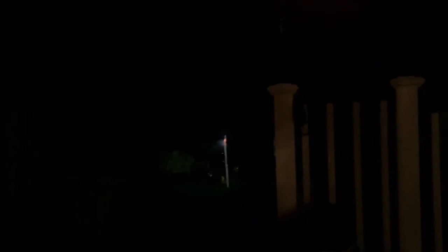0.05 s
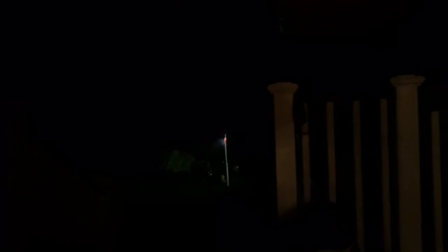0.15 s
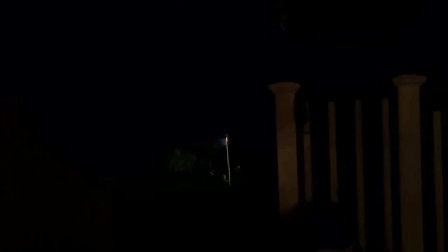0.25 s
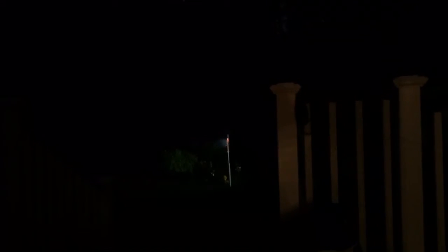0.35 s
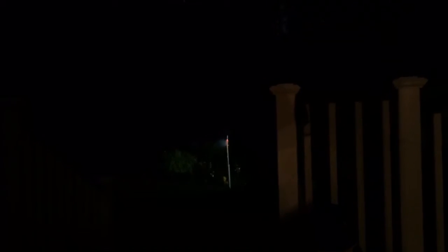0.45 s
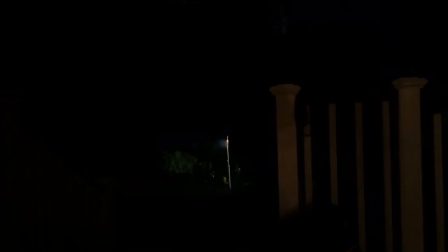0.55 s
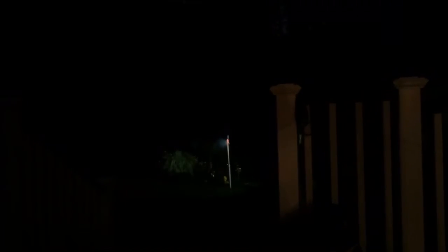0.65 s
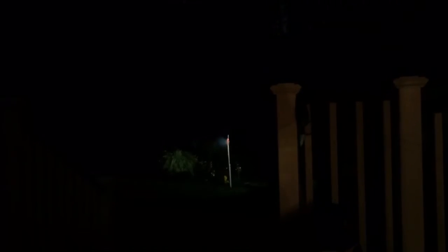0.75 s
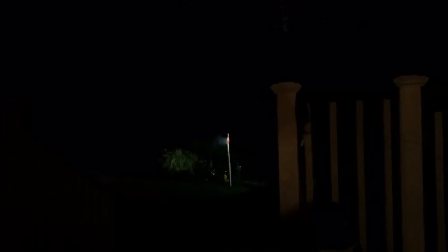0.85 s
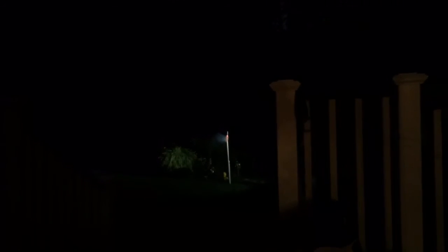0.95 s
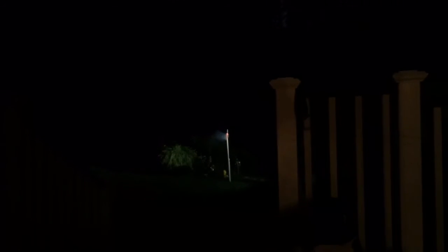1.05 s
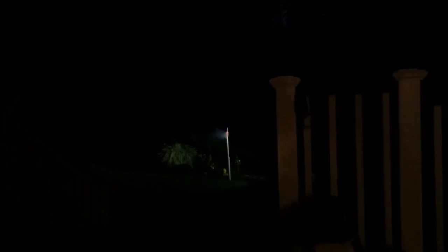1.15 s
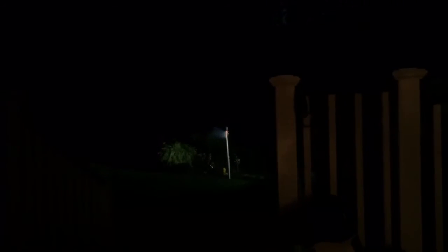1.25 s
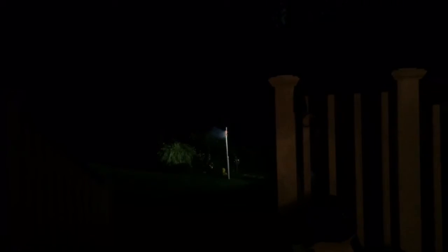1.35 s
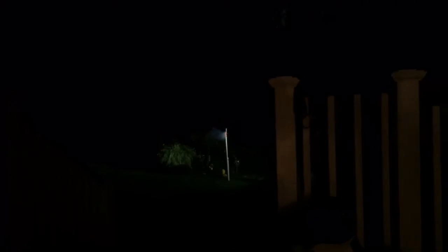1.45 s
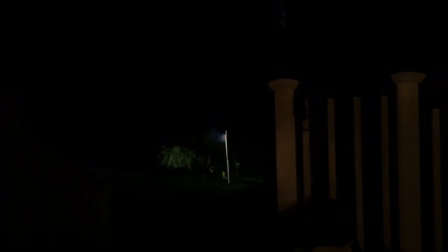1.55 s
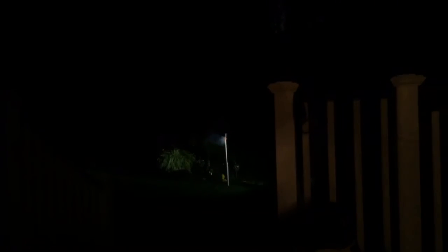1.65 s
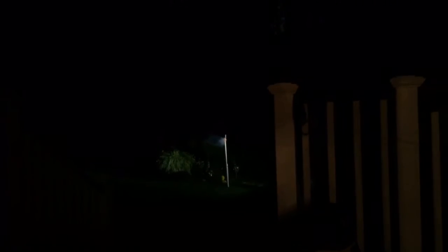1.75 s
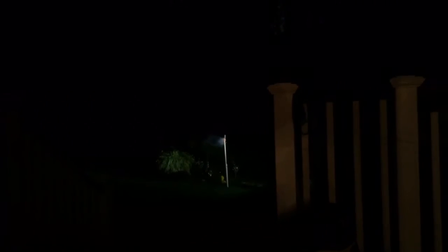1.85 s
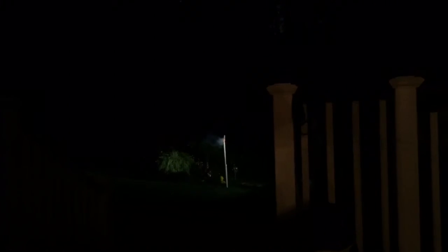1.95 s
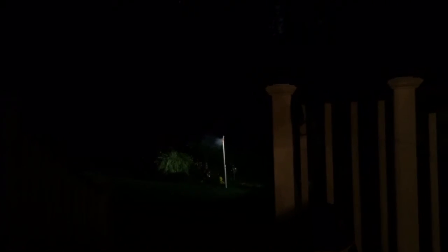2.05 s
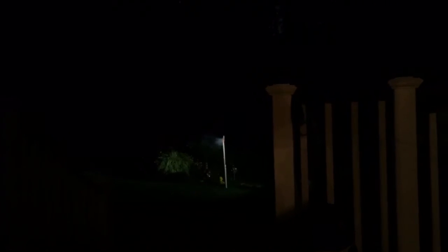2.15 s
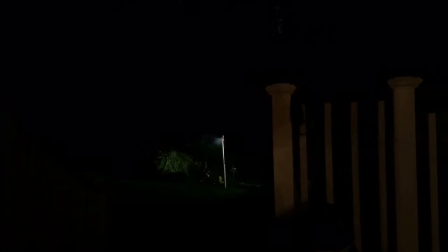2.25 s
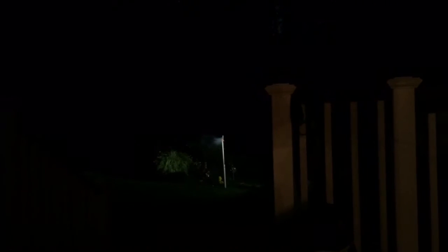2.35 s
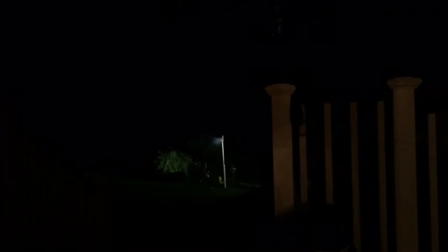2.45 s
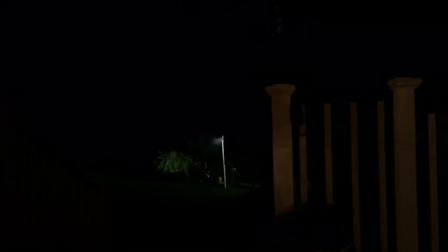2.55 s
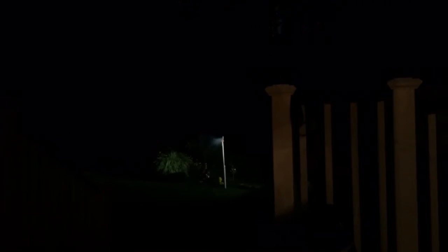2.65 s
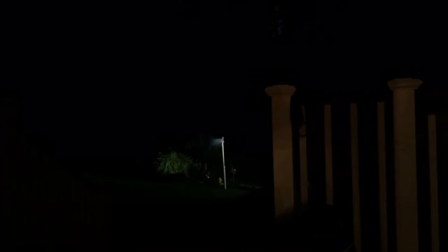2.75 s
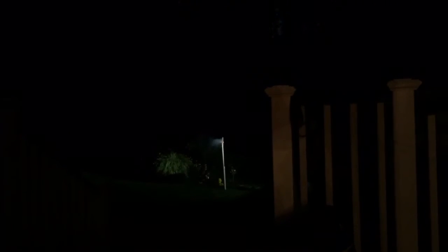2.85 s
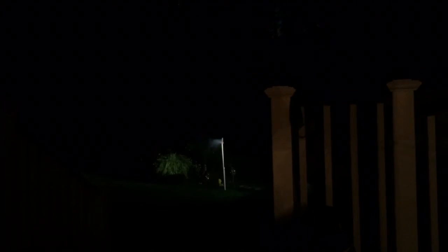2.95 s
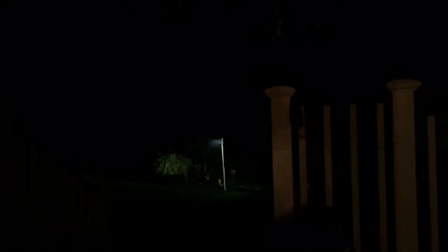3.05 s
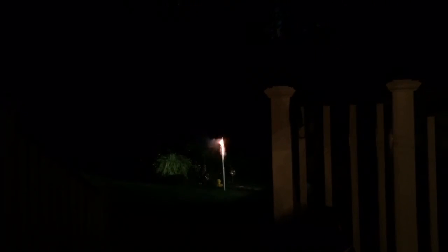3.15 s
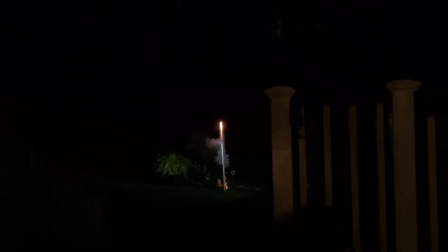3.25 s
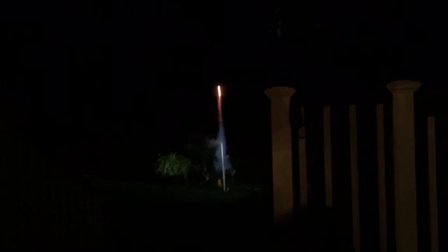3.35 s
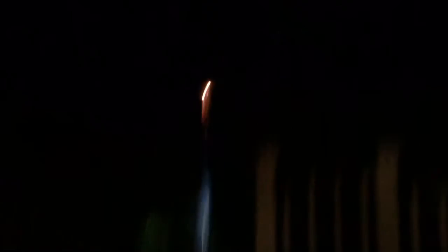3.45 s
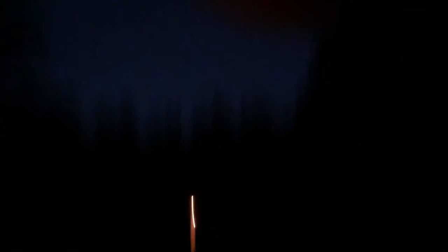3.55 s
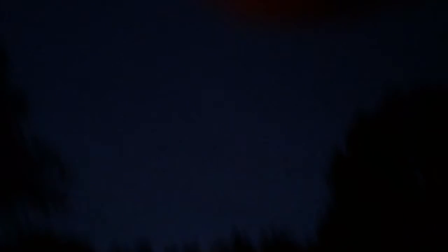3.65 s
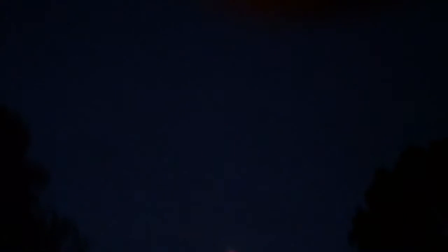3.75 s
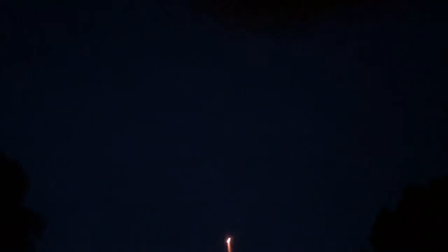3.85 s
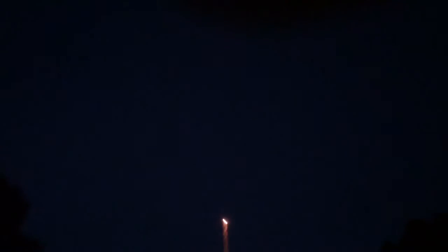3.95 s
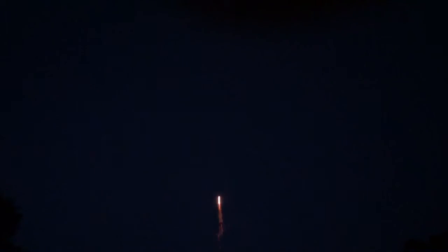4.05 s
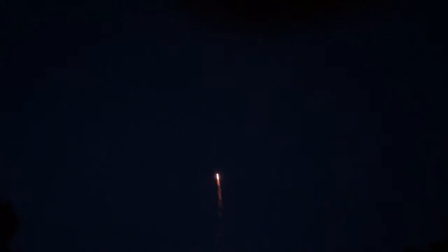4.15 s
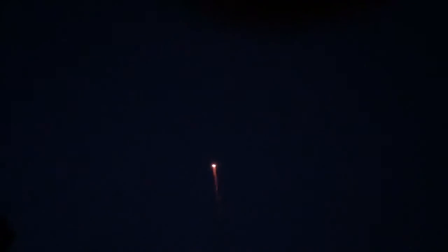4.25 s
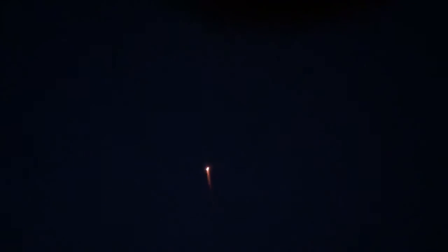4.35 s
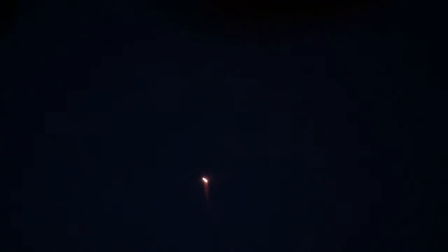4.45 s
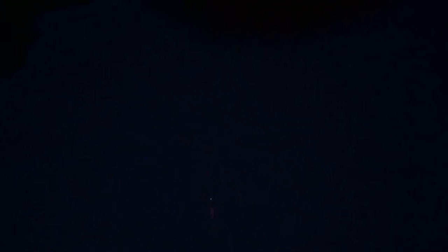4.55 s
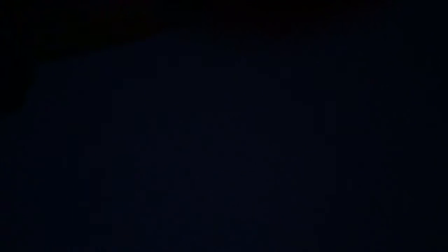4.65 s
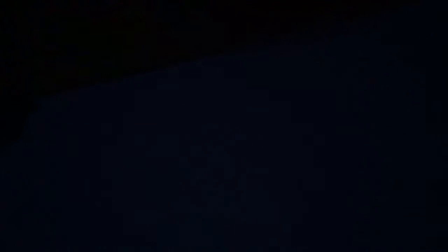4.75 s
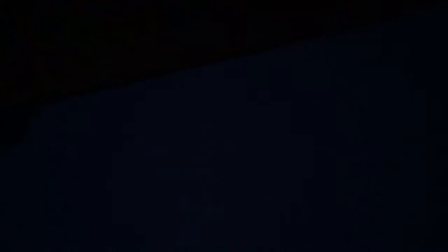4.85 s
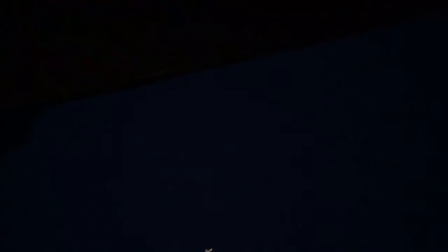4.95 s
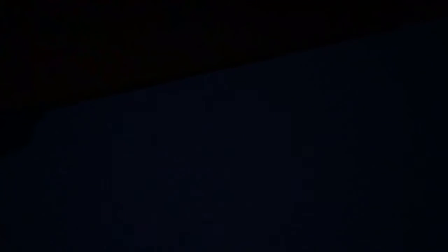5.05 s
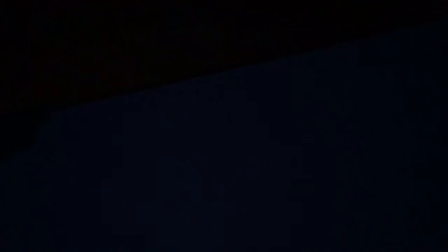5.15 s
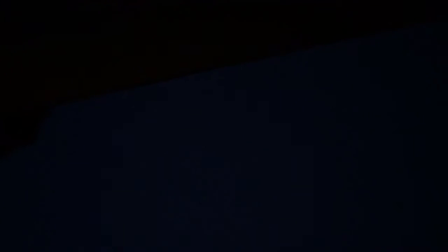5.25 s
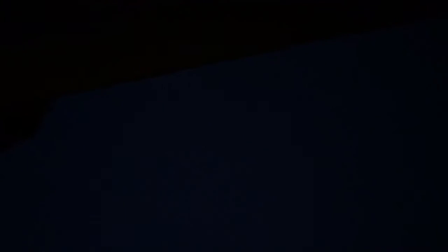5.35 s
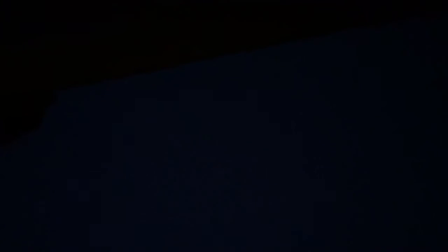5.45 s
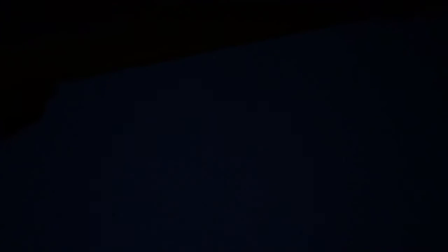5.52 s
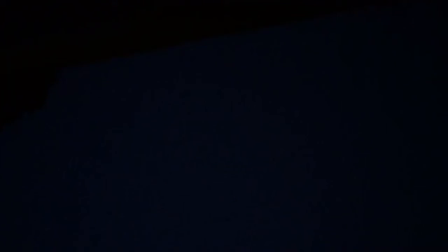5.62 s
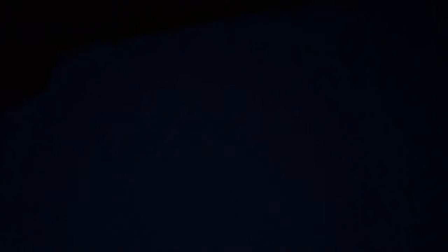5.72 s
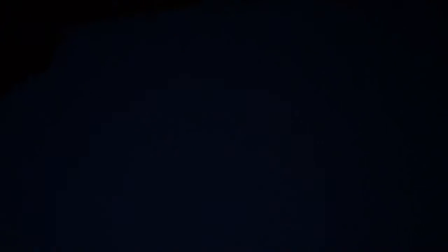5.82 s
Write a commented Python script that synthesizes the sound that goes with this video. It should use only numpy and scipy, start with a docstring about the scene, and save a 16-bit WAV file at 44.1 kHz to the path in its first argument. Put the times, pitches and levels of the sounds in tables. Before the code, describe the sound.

In a still night garden, soft air rumble, faint trilling insects and a fading fuse hiss are joined by two dull distant firework thuds. After three seconds a rocket spits alight and screams, piercing and raspy, its pitch sliding down as it climbs and stutters. It cuts out, leaves a short hiss, then bursts with a very sharp bang echoing off trees and houses. The fixed microphone overloads slightly and its automatic gain ducks.

```python
"""Night in a garden: still air, a far chorus of trilling insects, and a fuse's faint hiss over a low rumble.
The fuse pops once; then two far fireworks, low noise thumps, thud and roll over the land.
A whistling rocket lights with a spit: a pulsing pipe tone with overtones and rasping jet noise falls in pitch
as it climbs, falters, and roars when the nozzle tips towards the listener. It burns out, hisses on briefly
and bursts in sharp pressure pulses, a boom and a crack. Trees and houses scatter whistle and bang back."""
import sys
import numpy as np
from scipy import signal
from scipy.fft import rfft, irfft
from scipy.io import wavfile

SR = 44100
rng = np.random.default_rng(int(sys.argv[2]) if len(sys.argv) > 2 else 0)


def store_wav(level_fs):
    """Save 16-bit WAV to argv[1]."""
    pcm = np.round(np.clip(np.atleast_2d(level_fs), -1, 1) * 32767)
    wavfile.write(sys.argv[1], SR, pcm.T.astype(np.int16))


N = 259554
T = np.arange(N) / SR  # time of every sample [s]

# Spectra are colours only: their levels are relative, within each table.
# colour of the night air: (frequency [Hz], level per Hz [dB])
AIR_COLOUR = [(25, -17), (60, 4.5), (150, 2.5), (330, -2), (520, -12), (1000, -21.5), (1600, -20),
              (4000, -26), (9000, -28.5), (16000, -36)]
# insect chorus: (time [s], level [dB], centre frequency [Hz])
INSECT_CHORUS = [(0, -72, 2133), (1.9, -64, 2242), (2.55, -64.5, 2300), (3.2, -66.5, 2280)]
# colour of the noise before launch: the fuse's hiss over a low rumble, perhaps an earlier firework's roll:
# (frequency [Hz], level per Hz [dB])
PRELAUNCH_COLOUR = [(200, 8), (350, 18.5), (550, -4), (900, 3.5), (1600, -10), (4000, -9.5), (5350, -5.5),
                    (6200, -7), (8500, -11.5), (10000, -22.5), (12000, -10.5), (16000, -23)]
# soft knock of the fuse's pop: (frequency [Hz], level [dB], t60 [s])
SPARK_KNOCK = [(315, -26.5, 0.011), (120, -30, 0.026)]
# far fireworks: (time [s], level [dB], upper edge [Hz], echo delay [s],
#                 echo re thud [dB], rolling echo re thud [dB])
FAR_BANGS = [(0.921, -20.5, 361, 0.02, -3, -23), (2.204, -22.5, 468, .033, -12, -29.5)]
# colour of the thuds' rolling echo: (frequency [Hz], level per Hz [dB])
ROLL_COLOUR = [(24, -46), (40, -14), (70, -5.5), (161, -4.5), (215, 0), (279, 2), (355, -0.5), (496, -24),
               (843, -25), (1500, -42), (1950, -60), (3300, -120)]
# whistle pipe, which lengthens as the fuel burns: (time [s], pitch before flare, Doppler and jitter [Hz])
PIPE_PITCH = [(3.34, 2711), (3.59, 2553), (3.96, 2233), (4.13, 2244), (4.194, 2162), (4.248, 2165),
              (4.63, 1989)]
# the pipe sings softly a moment before the jet breaks out, and stops at burnout:
# (time [s], share of full tone [0-1])
PIPE_SINGING = [(3.267, 0), (3.279, .07), (3.283, .8), (3.292, 1), (4.666, 1), (4.68, 0)]
# the tone sinks, catches again and surges: (time [s], depth [dB], sinking time [s])
TONE_FADES = [(3.335, 3.5, 0.006), (3.416, 17.5, 0.018), (3.481, 21, 0.0047), (3.559, 3.5, 0.035),
              (3.652, 7.5, .06), (3.701, 10, 0.005), (3.756, 9, 0.0057), (3.843, 40, 0.012),
              (3.915, 17, 0.015), (3.977, 19, 0.013)]
# overtones of the pipe, before each path's trim: (multiple of the pitch [1], level [dB])
PIPE_OVERTONES = [(2, -6.5), (3, -8), (4, -14.5), (5, -13.5), (6, -16.5)]
# lines between them, from uneven alternate cycles, before HALF_ORDER_DB: (multiple of the pitch [1], level [dB])
HALF_ORDER_LINES = [(.5, -19.5), (1.5, -8), (2.5, -4.5), (3.5, -6), (4.5, -8.5), (5.5, -16.5), (6.5, -19.5)]
# colour of the exhaust jet: (frequency [Hz], level per Hz [dB])
JET_COLOUR = [(60, -36.5), (350, -13.5), (750, -16.5), (1200, -17), (2000, 6), (3100, 1.5), (5000, 1.5),
              (7200, 6.5), (9000, 5.5), (10500, -6), (16000, -8.5)]
# thumps of the motor lighting, leaving the ground and dying, before ROCKET_DB:
# (time [s], level [dB], t60 [s], upper edge [Hz])
MOTOR_THUMPS = [(3.282, -36, 0.11, 587), (3.3, -33, 0.18, 61), (4.672, -51, 0.11, 560)]
# scatter from the surroundings:
# (frequency [Hz], near trees per Hz [dB], far houses per Hz [dB], far t60 [s])
SURROUNDINGS = [(59, -25.5, -13.5, 8.5), (206, -6, -8, 2.45), (513, -8, -6.5, 6.2), (1080, 13, 3.5, 2.2),
                (2040, 7.5, 4.5, 3.01), (3220, 15.5, -6, 2.04), (5080, -10.5, -2.5, 1.24),
                (8470, 3, -10.5, 0.73), (15110, -11.5, -23.5, 0.36)]
# the burst and its echoes off ground and walls, before ROCKET_DB: (time [s], level [dB], pulse length [s])
BURST_PULSES = [(5.1892, 15, 0.00036), (5.1895, 13.5, 0.00039), (5.1899, -9, 0.001197),
                (5.1921, -5.5, 0.00066), (5.1973, -12.5, 0.00076), (5.199, -8.5, 0.00322),
                (5.203, -7, 0.00064), (5.223, -9, 0.00036)]
# colour of the nearest echoes' clutter: (frequency [Hz], level per Hz [dB])
CLUTTER_COLOUR = [(24, -25.5), (40, -4), (96, 0), (290, 7), (516, -1), (1240, 4), (1810, -29), (2260, 0.5),
                  (2570, -9), (3470, 0.5), (4930, -10), (11800, -57), (16000, -22)]

# the noise before launch sinks as the fuse burns into the casing
PRELAUNCH_START_DB, PRELAUNCH_FALL_DB_PER_S, PRELAUNCH_FLICKER_DB = -62, 9, 2
SPARK_S = 0.24
FAR_BANG_T60_S, FAR_ECHO_T60_S = 0.096, 0.25
IGNITION_S, BURNOUT_S = 3.28, 4.666
ROCKET_DB = 8  # raises all the rocket's levels below against the night
# a brief flare at ignition lifts pitch, tone and rasp
FLARE_HZ, FLARE_PITCH_HOLD_S, FLARE_PITCH_S = 332, 0.012, 0.009
FLARE_TONE_DB, FLARE_RASP_DB, FLARE_S = 4, 11, 0.064
# levels at lift-off, and their fall as the rocket climbs away; half orders and jet are relative to the rasp
TONE_DB, TONE_FALL_DB_PER_S = -9, 11
RASP_DB, RASP_FALL_DB_PER_S = -28, 6.5
HALF_ORDER_DB, HALF_ORDER_FALL_DB_PER_S = 2, 8
JET_DB, JET_FALL_DB_PER_S = -4.5, 4
# each drop-out of the tone ends in a quick catch and an overshoot
CATCH_S, SURGE_DB, SURGE_AFTER_S = 0.0065, 1.5, 0.017
# the nozzle tips towards the listener once: jet and low roar swell, the pitch gets rougher
TIP_S, TIP_ATTACK_S, TIP_HOLD_S, TIP_RELEASE_S = 4.0, 0.05, 0.21, 0.24
TIP_JET_DB, ROAR_DB, TIP_ROAR_DB = 7.5, -23.5, 11.5
TIP_TONE_LOSS_DB, TIP_FLUTTER_DB = 1.5, 1
JITTER, TIP_JITTER = 0.00475, 0.0096  # share of the pitch; the tip's is added
ROUNDING_DB_PER_S = 25  # loss from the tip onwards, for each multiple above the fourth
COLLAPSE_S = 4.63  # the tone breaks down just before burnout
BLOW_OUT_T60_S, BLOW_OUT_HZ = 1, 4500  # hiss after burnout, and its lower edge
# treble loss at 10 kHz, growing as the rocket gathers speed; each path takes a share of it
AIR_LOSS_DB_PER_S2 = 1
DIRECT_AIR_SHARE, SCATTER_AIR_SHARE = 0.86, 0.087
# more of the tone reaches the surroundings once the rocket clears the trees
CLEARING_S, SHADED_DB = 0.52, 20.5
SCATTER_TONE_DB, SCATTER_TONE_FALL_DB_PER_S = -18.5, 10
SCATTER_RASP_DB, SCATTER_RASP_FALL_DB_PER_S = -28, 0.5
# automatic gain: turned down under loud sound, slow to recover
DUCK_ABOVE_DB, DUCK_MOST_DB, DUCK_ATTACK_S, DUCK_RELEASE_DB_PER_S = -14.5, 8, 0.0011, 2.5
CUTOFF_HZ = 15900


def from_db(db):
    """Decibels to an amplitude factor."""
    return 10 ** (np.asarray(db) / 20)


def rms_one(x):
    """Scale to rms 1."""
    return x / np.sqrt(np.mean(x ** 2) + 1e-20)


def in_time(rows):
    """Each column of a curve, at every sample."""
    s, *columns = np.transpose(rows)
    return [np.interp(T, s, column) for column in columns]


def at_hz(points, hz, axis=1):
    """One column of a spectrum, read on a log-frequency axis."""
    points = np.array(points)
    return np.interp(np.log(hz), np.log(points[:, 0]), points[:, axis])


def butter(x, hz, kind, order=2):
    """Butterworth low- or high-pass."""
    sos = signal.butter(order, np.clip(hz, 10, 0.45 * SR), kind, fs=SR, output="sos")
    return signal.sosfilt(sos, x)


def drift(rate_hz):
    """Slow random wandering, rms 1."""
    f = np.arange(N // 2 + 1) * SR / N
    return rms_one(irfft(rfft(rng.standard_normal(N)) / (1 + (f / rate_hz) ** 4), N))


def noise(spectrum):
    """Steady noise of a given colour, rms 1."""
    f = np.arange(N // 2 + 1) * SR / N + 1
    return rms_one(irfft(rfft(rng.standard_normal(N)) * from_db(at_hz(spectrum, f)), N))


def bands(x):
    """Split into half-octave bands that add up to the whole: (centre Hz, band)."""
    centres = np.geomspace(40, 16000, 18)
    log_f = np.log(np.arange(N // 2 + 1) * SR / N + 1)
    whole = rfft(x)
    split = []
    for hz, one in zip(centres, np.eye(len(centres))):
        share = np.interp(log_f, np.log(centres), one)
        split.append((hz, irfft(whole * share, N)))
    return split


def blurred_line(phase, width_hz):
    """A tone whose strength and phase wander, about rms 1."""
    return (drift(width_hz) * np.sin(phase) + drift(width_hz) * np.cos(phase)) / np.sqrt(2)


def decay(start, t60, rise):
    """An envelope that swells and dies away by 60 dB per t60."""
    age = np.maximum(T - start, 0)
    return (1 - np.exp(-age / rise)) * from_db(-60 * age / t60)


def ramp(start, length):
    """Rises from nothing to one."""
    return np.clip((T - start) / length, 0, 1)


def night_air(level_db=-63.0):
    """Still air as steady coloured noise."""
    return from_db(level_db) * noise(AIR_COLOUR)


def insects(width_hz=185, throb_db=2.5):
    """Many far trills blend into one blurred, throbbing line."""
    level, centre = in_time(INSECT_CHORUS)
    trill = blurred_line(2 * np.pi * np.cumsum(centre) / SR, width_hz)
    return trill * from_db(level + throb_db * drift(8.3))


def fuse_and_rumble(whistle_hz=5400, whistle_width_hz=110, whistle_db=-11.5):
    """Burning powder hisses with a thin whistle, over a low rumble, until the rocket lights."""
    thin_whistle = blurred_line(2 * np.pi * whistle_hz * T, whistle_width_hz)
    hiss_and_rumble = noise(PRELAUNCH_COLOUR)
    sound = hiss_and_rumble + from_db(whistle_db) * thin_whistle
    level = PRELAUNCH_START_DB - PRELAUNCH_FALL_DB_PER_S * T + PRELAUNCH_FLICKER_DB * drift(8.7)
    return sound * from_db(level) * (T < IGNITION_S)


def spark(tick_db=-49, tick_t60=0.024, tick_hz=2600):
    """One small, soft pop of the burning fuse: a faint noise tick and a low knock of dying sines."""
    burst_noise = rng.standard_normal(N) * decay(SPARK_S, tick_t60, 0.00018)
    pop = from_db(tick_db) * butter(burst_noise, tick_hz, "low", order=1)
    for hz, db, t60 in SPARK_KNOCK:
        pop += from_db(db) * np.sin(2 * np.pi * hz * (T - SPARK_S)) * decay(SPARK_S, t60, 0.0003)
    return pop


def thud(s, db, t60, edge_hz, crack_db=-29.0, crack_hz=1450):
    """A blast of dying noise, low-passed to a low thump with a faint dull crack."""
    blast = butter(rng.standard_normal(N) * decay(s, t60, 0.00077), edge_hz / 4, "high")

    def below(hz):
        # the root makes up for the narrower band
        return butter(blast, hz, "low", order=6) * np.sqrt(SR / hz)

    return from_db(db) * (below(edge_hz) + from_db(crack_db) * below(crack_hz))


def far_fireworks(roll_t60=6.17):
    """Dull thuds that each echo once and roll on over the land as slowly dying noise."""
    thuds, roll_power = np.zeros(N), np.zeros(N)
    for s, db, edge_hz, delay, echo_db, roll_db in FAR_BANGS:
        thuds += thud(s, db, FAR_BANG_T60_S, edge_hz)
        thuds += thud(s + delay, db + echo_db, FAR_ECHO_T60_S, edge_hz)
        roll_power += (from_db(db + roll_db) * decay(s, roll_t60, 0.12)) ** 2
    return thuds + np.sqrt(roll_power) * noise(ROLL_COLOUR)


def flight_time():
    """Seconds since ignition, zero before it."""
    return np.maximum(T - IGNITION_S, 0)


def tipping():
    """How far the nozzle points at the listener, 0-1."""
    return ramp(TIP_S, TIP_ATTACK_S) - ramp(TIP_S + TIP_ATTACK_S + TIP_HOLD_S, TIP_RELEASE_S)


def faltering():
    """Change of the tone in dB: at each drop-out it sinks, catches quickly and overshoots."""
    def bump(s, width):
        return np.exp(-((T - s) / width) ** 2)

    change = np.zeros(N)
    for s, depth, sink in TONE_FADES:
        change -= depth * bump(s, np.where(T < s, sink, CATCH_S))
        change += SURGE_DB * bump(s + SURGE_AFTER_S, SURGE_AFTER_S / 2)
    return change


def whistle(tone_db, rasp_db, doppler, smear, air_share, overtones_db, tilt_db, overtone_fade_db=3.0,
            half_width_hz=170, sputter_db=1.74, roar_hz=1550, roar_width_hz=330):
    """The fuel burns in pulses at the pipe's pitch; alternate cycles are uneven, and the jet roars around them."""
    (pitch,), (singing,) = in_time(PIPE_PITCH), in_time(PIPE_SINGING)
    age, tipped = flight_time(), tipping()
    pitch = pitch + FLARE_HZ * np.exp(-np.maximum(age - FLARE_PITCH_HOLD_S, 0) / FLARE_PITCH_S)
    # doppler, jitter and smear are shares of the pitch
    roughness = np.hypot(JITTER + TIP_JITTER * tipped, smear)
    phase = 2 * np.pi * np.cumsum(pitch * (1 + doppler + roughness * drift(202.3))) / SR
    air_loss = air_share * AIR_LOSS_DB_PER_S2 * age ** 2
    rounding = ROUNDING_DB_PER_S * np.maximum(T - TIP_S, 0)

    def through_air(hz):
        return from_db(-air_loss * (hz / 10 ** 4) ** 2)

    def line_gain(k, db):
        # the lengthening pipe rounds its pulses, so the highest lines sink into the hiss
        return from_db(db - rounding * max(k - 4, 0)) * through_air(k * pitch)

    jet_db = JET_DB - JET_FALL_DB_PER_S * age + TIP_JET_DB * tipped + sputter_db * drift(62.4)
    jet = sum(band * through_air(hz) for hz, band in bands(noise(JET_COLOUR))) * from_db(jet_db)
    blow_out = butter(jet, BLOW_OUT_HZ, "high") * decay(BURNOUT_S, BLOW_OUT_T60_S, 0.0046)
    # a lower roar swells while the nozzle points down at the listener
    roar_db = ROAR_DB + TIP_ROAR_DB * tipped + 2.5 * drift(35)
    rasp = jet + blurred_line(2 * np.pi * roar_hz * T, roar_width_hz) * from_db(roar_db)
    for k, db in PIPE_OVERTONES:
        level = db + overtones_db + tilt_db * (k - 2) + overtone_fade_db * drift(29)
        rasp += np.sqrt(2) * np.sin(k * phase) * line_gain(k, level)
    half_db = HALF_ORDER_DB - HALF_ORDER_FALL_DB_PER_S * age
    for k, db in HALF_ORDER_LINES:
        rasp += blurred_line(k * phase, half_width_hz) * line_gain(k, db + half_db)
    tone = singing * np.sqrt(2) * np.sin(phase) * from_db(tone_db)
    return tone + (singing ** 2 * rasp + blow_out) * from_db(rasp_db)


def direct_whistle(flutter_db=2.0, collapse_db=8.5):
    """Straight from the rocket: it flares, fades with distance, flutters, drops out and collapses at the end."""
    age, tipped = flight_time(), tipping()
    flare = np.exp(-age / FLARE_S)
    tone = TONE_DB - TONE_FALL_DB_PER_S * age + FLARE_TONE_DB * flare - TIP_TONE_LOSS_DB * tipped
    tone = tone + faltering() + (flutter_db + TIP_FLUTTER_DB * tipped) * drift(52)
    tone = tone - collapse_db * ramp(COLLAPSE_S, 0.0092)
    rasp = RASP_DB - RASP_FALL_DB_PER_S * age + FLARE_RASP_DB * flare
    return whistle(tone, rasp, doppler=0, smear=0, air_share=DIRECT_AIR_SHARE, overtones_db=1.3, tilt_db=0)


def scattered_whistle():
    """The rocket recedes more slowly from the trees at the sides: what reaches them is higher and smeared."""
    age = flight_time()
    tone = SCATTER_TONE_DB - SCATTER_TONE_FALL_DB_PER_S * age
    tone = tone - SHADED_DB * (1 - ramp(IGNITION_S, CLEARING_S))
    rasp = SCATTER_RASP_DB - SCATTER_RASP_FALL_DB_PER_S * age
    return whistle(tone, rasp, doppler=0.022, smear=0.0158, air_share=SCATTER_AIR_SHARE,
                   overtones_db=-3.0, tilt_db=4.5)


def tree_response(rise=0.0098, near_t60=0.25):
    """Countless weak echoes from near trees and far houses, as noise bands that each die at their own rate."""
    echo = 0
    for hz, band in bands(noise([(20, 0.0093), (20000, 0.00043)])):  # practically white
        near = from_db(at_hz(SURROUNDINGS, hz)) * decay(0, near_t60, rise)
        far_t60 = at_hz(SURROUNDINGS, hz, axis=3)
        far = from_db(at_hz(SURROUNDINGS, hz, axis=2)) * decay(0, far_t60, rise)
        echo = echo + band * np.hypot(near, far)
    # gain 1 near the whistle's pitch
    near_pitch = slice(1500 * N // SR, 2600 * N // SR)
    return echo / np.sqrt(np.mean(np.abs(rfft(echo)[near_pitch]) ** 2))


def ignition(spit_db=-14, spit_t60=0.09):
    """The jet breaks out of the nozzle with a short spit of noise."""
    return from_db(spit_db) * noise(JET_COLOUR) * decay(IGNITION_S, spit_t60, 0.0011)


def motor_thumps():
    """Dull blasts as the motor lights, leaves the ground and dies."""
    return sum(thud(*row) for row in MOTOR_THUMPS)


def burst(clutter_db=-10.0, clutter_t60=0.17, edge_hz=10000, low_hz=62, boom_db=-17.5, boom_hz=125,
          boom_t60=0.08, crack_db=-10, crack_hz=2750, crack_width_hz=230, crack_t60=0.056):
    """N-shaped pressure pulses, a short boom, a ringing crack and a clutter of echoes from fence and walls."""
    pulses, start = np.zeros(N), BURST_PULSES[0][0]
    for s, db, length in BURST_PULSES:
        age = (T - s) / length
        pulses += from_db(db) * (1 - 2 * age) * ((age >= 0) & (age < 1))
    pulses = butter(pulses, edge_hz, "low", order=1)
    clutter = from_db(clutter_db) * noise(CLUTTER_COLOUR) * decay(start, clutter_t60, 0.0003)
    boom = from_db(boom_db) * np.sin(2 * np.pi * boom_hz * (T - start)) * decay(start, boom_t60, 0.00051)
    ring = blurred_line(2 * np.pi * crack_hz * T, crack_width_hz)
    crack = from_db(crack_db) * ring * decay(start, crack_t60, 0.00035)
    return butter(pulses + boom + crack + clutter, low_hz, "high", order=4)


def scattered_echoes(bang_echo_db=3.5):
    """Whistle and burst, scattered back by convolution with the surroundings' response."""
    to_trees = scattered_whistle()
    # high in the sky the burst reaches the whole neighbourhood as one sharp impulse
    to_trees[round(BURST_PULSES[0][0] * SR)] += 10 * from_db(bang_echo_db)
    return signal.fftconvolve(to_trees, tree_response())[:N]


def scene():
    """Whistle and burst with their echoes, over the sounds of the night."""
    night = night_air() + insects() + fuse_and_rumble() + spark() + far_fireworks()
    rocket = direct_whistle() + scattered_echoes() + ignition() + motor_thumps() + burst()
    return (night + from_db(ROCKET_DB) * rocket)[None]


def gain_control(x):
    """Loud peaks turn the gain down within milliseconds; it creeps back up."""
    over = np.clip(20 * np.log10(np.abs(x) + 1e-9) - DUCK_ABOVE_DB, 0, DUCK_MOST_DB)
    # hold the highest excess so far, released at a steady rate
    release = DUCK_RELEASE_DB_PER_S * T
    held = np.maximum.accumulate(over + release, axis=-1) - release
    keep = np.exp(-1 / (DUCK_ATTACK_S * SR))
    return x * from_db(-signal.lfilter([1 - keep], [1, -keep], held))


def record(dry, top=0.6):
    """The gain ducks, the loudest peaks overload; the top is cut."""
    ducked = gain_control(dry)
    clipped = ducked / (1 + (ducked / top) ** 8) ** (1 / 8)
    top_cut = signal.ellip(10, 0.2, 80, CUTOFF_HZ, fs=SR, output="sos")
    return signal.sosfilt(top_cut, clipped)


dry = scene()
out = record(dry)
store_wav(out)
```